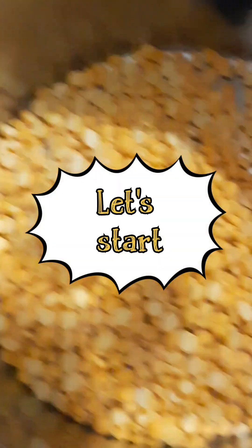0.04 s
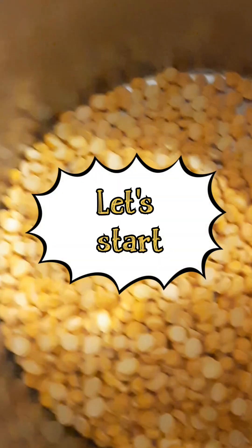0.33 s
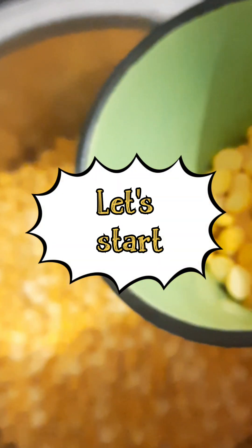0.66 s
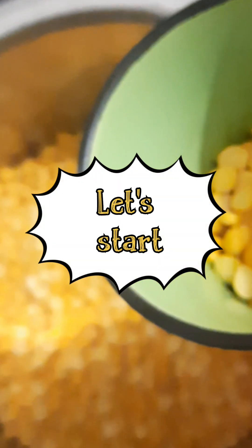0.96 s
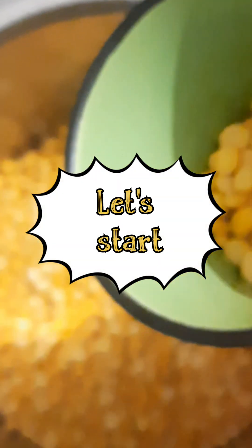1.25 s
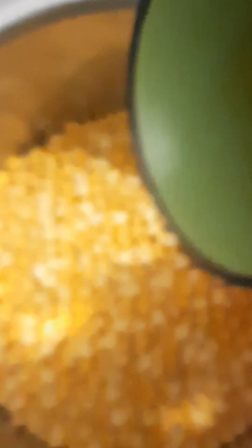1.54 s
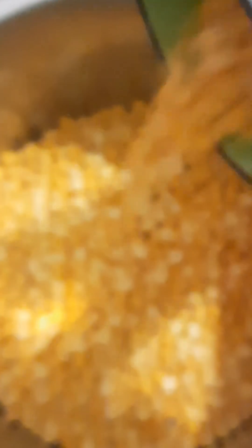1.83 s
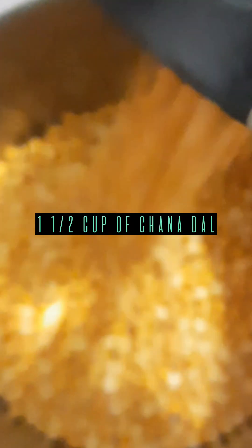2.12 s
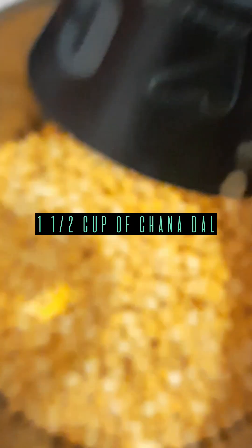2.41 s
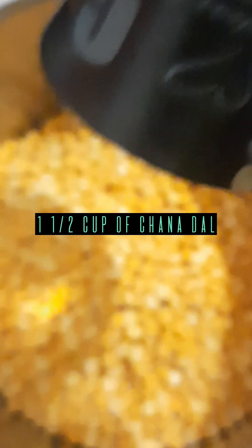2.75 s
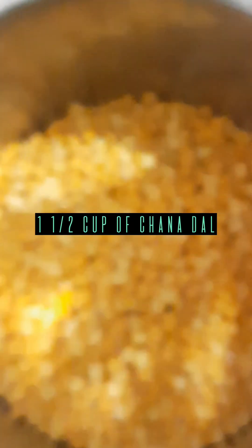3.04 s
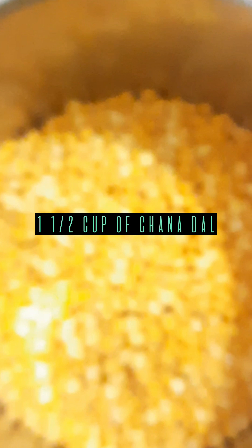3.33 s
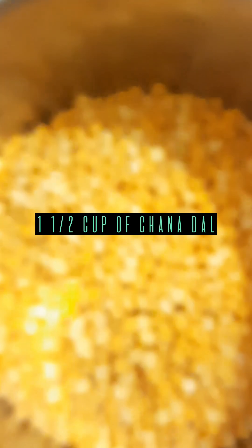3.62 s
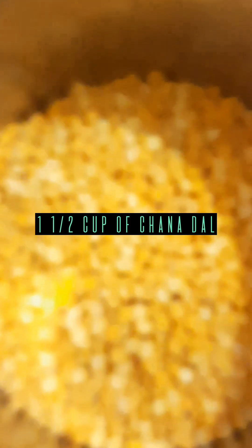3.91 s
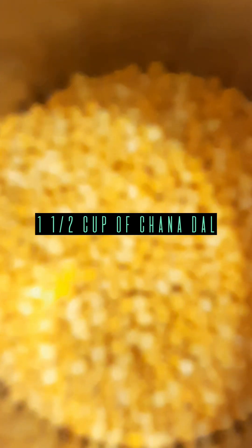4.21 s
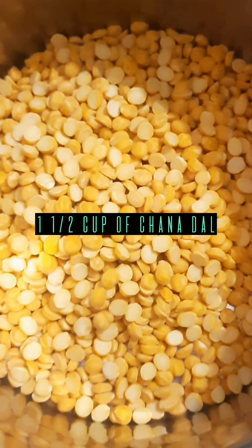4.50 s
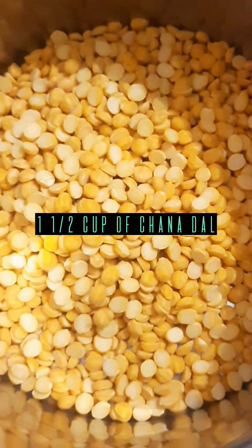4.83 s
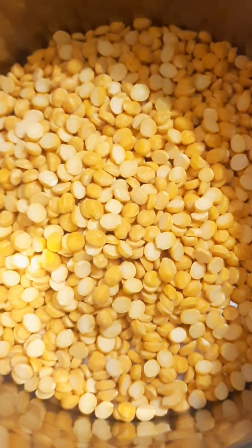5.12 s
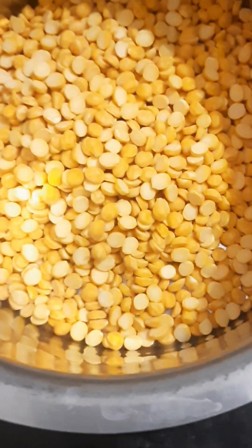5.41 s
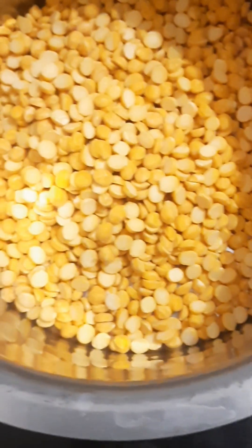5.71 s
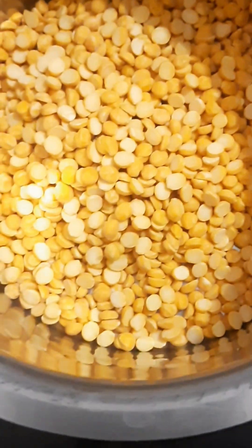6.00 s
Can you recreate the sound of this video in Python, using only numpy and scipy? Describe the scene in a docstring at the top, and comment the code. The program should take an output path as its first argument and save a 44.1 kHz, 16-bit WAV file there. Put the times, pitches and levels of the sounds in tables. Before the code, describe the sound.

A very faint, low kitchen rumble opens, with tiny handling clicks at about 0.2 and 0.4 seconds, and rises slightly around 1 second. From 1.6 seconds, dry lentils skitter softly down a tilted steel cup, close and on the left. Just before 2 seconds, a sharp tick starts the pour: countless small, bright collisions on a heap of lentils merge into a rattling hiss while the steel pot resounds. The stream is fullest near 2.2 seconds and dies away by 2.6. After a pause with only room tone, the empty cup knocks on the counter at 3.9 seconds with a dull thud, rocks in a quick clatter around 4.1 to 4.2, and rings briefly. The low rumble continues to the end at about 6 seconds, with faint blurred tones and a couple of light clicks. The sound is close, picked up by a hand-held phone, with little echo.

```python
"""First comes the low rumble of a kitchen, swelling and sinking, with faint tones and handling clicks.
Close to the hand-held phone's two microphones, dry lentils skitter down a tilted steel cup and pour
onto a heap of lentils in a steel pot: countless small collisions click, and the pot resounds.
The empty cup is then put down on the counter, where it knocks, rocks and rings briefly."""
import sys
import numpy as np
from scipy import signal
from scipy.fft import rfft, irfft
from scipy.io import wavfile
from scipy.ndimage import uniform_filter1d

SR = 44100
rng = np.random.default_rng(int(sys.argv[2]) if len(sys.argv) > 2 else 0)


def write(x):
    x = np.atleast_2d(x).T
    wavfile.write(sys.argv[1], SR, np.round(np.clip(x, -1, 1) * 32767).astype(np.int16))


N = 271458
T = np.arange(N) / SR


def undb(db):
    """Decibels to gain; the levels in the tables are relative, ahead of each layer's own gain."""
    return 10 ** (np.asarray(db) / 20)


def unit(x):
    """Scale to rms 1."""
    return x / np.sqrt(np.mean(x ** 2))


def pan(db):
    """Gains for a level difference, left microphone minus right."""
    return undb(np.array([[db], [-db]]) / 2)


def swell(peak_s, rise_s, fall_s):
    """Gain that grows exponentially to 1 and decays again."""
    return np.exp(-np.maximum((peak_s - T) / rise_s, (T - peak_s) / fall_s))


def wander(rate_hz):
    """Smooth random drift with a spread near 1."""
    hold = int(SR / rate_hz)
    steps = np.repeat(rng.standard_normal(N // hold + 1), hold)
    return unit(uniform_filter1d(uniform_filter1d(steps, hold), hold)[:N])


def through(x, response):
    """Pass a sound through an impulse response."""
    return signal.fftconvolve(np.atleast_2d(x), np.atleast_2d(response), axes=1)[:, :N]


def colour(x, spectrum, size=4096):
    """Causal filter of unit energy through (frequency [Hz], level [dB]) points."""
    hz, db = np.transpose(spectrum)
    octave = np.log2(np.maximum(np.arange(size // 2 + 1), .5) * SR / size)
    skirt_db = 12 * np.minimum(octave - np.log2(hz[0]), 0)
    gain = undb(np.interp(octave, np.log2(hz), db) + skirt_db)
    cepstrum = irfft(np.log(gain))
    cepstrum[1:size // 2] *= 2  # fold to minimum phase
    cepstrum[size // 2 + 1:] = 0
    response = irfft(np.exp(rfft(cepstrum)))
    return through(x, response / np.linalg.norm(response))


def ring(modes, damping=1):
    """Response of decaying modes; the higher ones reach the two microphones out of step."""
    t, out = T[:SR], 0
    for hz, db, t60, pan_db in modes:
        lead = np.array([[.5], [-.5]]) * min(hz / 700, 2)
        decay = np.exp(-np.log(1000) * t * damping / t60)
        out = out + undb(db) * pan(pan_db) * np.sin(2 * np.pi * hz * t + lead) * decay
    return out


def echoes(x, t60, wet_db, build_s):
    """Add dense reflections that build up and die away, unrelated left and right."""
    t = T[:SR]
    tail = rng.standard_normal((2, SR)) * np.exp(-np.log(1000) * t / t60) * (1 - np.exp(-t / build_s))
    return x + undb(wet_db) * through(x, tail / np.linalg.norm(tail[0]))


def near_reflection(x, lag_s, sway, echo_db):
    """An echo whose path changes as the phone sways in the hand; its comb of peaks drifts."""
    late = [np.interp(T - lag_s * np.exp(sway * wander(2.527)), T, channel) for channel in x]
    return x + undb(echo_db) * np.array(late)


def scatter(x, t60, wet_db):
    """Every click gets its own short noisy tail from the grains and walls around it."""
    fade = np.exp(-2 * np.log(1000) * T[:SR // 4] / t60)
    energy = np.maximum(through(x ** 2, fade / fade.sum()), 0)
    return x + undb(wet_db) * np.sqrt(energy) * rng.standard_normal((2, N))


def blows(times, db):
    """One impulse for each contact."""
    return np.bincount(np.round(np.asarray(times) * SR).astype(int), undb(db), N)[:N]


def chatter(times, db, length_s, count=6):
    """Each blow is followed by a few fading micro-contacts of the rim."""
    lateness = rng.random((len(times), count))
    late_s = np.asarray(times)[:, None] + length_s * lateness
    late_db = db[:, None] - 10 - 8 * lateness
    return blows(times, db) + blows(late_s.ravel(), late_db.ravel())


def collisions(per_s, spread_db):
    """Random hits, mostly small; each lands at its own place, with its own lag between microphones."""
    chance = np.minimum(per_s / SR, 1) * np.ones(N)
    at = np.flatnonzero(rng.random(N) < chance)
    size_db = spread_db * np.minimum(rng.exponential(size=len(at)), 4)
    size = unit(undb(size_db)) / np.sqrt(chance[at])  # same power at any rate
    size = size * rng.choice([-1, 1], len(at))
    lag = rng.integers(-9, 10, len(at))
    return np.array([np.bincount(at, size, N), np.bincount((at + lag) % N, size, N)])


# Spectra of the room tone's four layers (frequency [Hz], level [dB])
RUMBLE_SPECTRUM = [(30, -28.5), (45, 0), (70, -1), (113, 3), (151, -9.5), (181, -1), (240, -7.5),
                   (300, -0.5), (395, -10), (500, -15), (700, -20.5), (1000, -58)]
MIDDLE_SPECTRUM = [(250, -13), (450, 3), (620, -0.5), (860, 5), (1150, -2), (1400, -9), (2200, -13),
                   (3000, -28.5), (6000, -48.5)]
HISS_SPECTRUM = [(900, -24), (2200, 7), (3300, 6.5), (5200, 1), (7400, 1), (9800, -10.5), (12500, -9.5),
                 (16000, -9.5)]
RUSH_SPECTRUM = [(500, -13), (1200, 7.5), (2200, 6), (3400, 3.5), (5200, -6.5), (7400, -9.5), (9800, -23),
                 (15500, -23.5)]
# Rise and fall of the room tone (time [s], level [dB])
ROOM_LEVEL = [(0.0, -71.5), (0.234, -70), (0.95, -67.5), (1.04, -53.5), (1.19, -54), (2.49, -54.5),
              (2.77, -60.5), (3.59, -58), (4.13, -43), (4.52, -50.5), (5.44, -51), (5.57, -50.5),
              (5.64, -56), (6.156, -56.5)]
# Swells of soft rushing noise (peak time [s], rise [s], fall [s], middle [dB], rush [dB], hiss [dB])
ROOM_SWELLS = [(1.16, 0.045, 0.16, -48.5, -55.5, -88), (3.921, 0.21, 0.31, -72, -58, -58.5),
               (4.158, 0.14, 0.05, -37.5, -51.5, -59.5), (5.54, 0.068, 0.034, -60, -70, -78)]

def room_tone():
    """The kitchen all around: rumble alike at both microphones, a diffuse middle, hiss and swells."""
    level_db = np.interp(T, *np.transpose(ROOM_LEVEL))
    usual_db = -54.5
    middle_gain = undb(-62 + 1.41 * (level_db - usual_db))  # swings further than the rumble
    hiss_gain = undb(-75.5 - 15.5 * (T < 0.99))  # steady after a much quieter start
    middle_swell, rush_swell, hiss_swell = sum(
        undb(db)[:, None] * swell(s, rise_s, fall_s) for s, rise_s, fall_s, *db in ROOM_SWELLS)
    noise = rng.standard_normal((9, N))
    rumble = colour(noise[0] * pan(1.2) + undb(-13) * noise[1:3], RUMBLE_SPECTRUM)
    rumble *= undb(level_db + 2 + 0.7 * wander(10))
    middle = near_reflection(colour(noise[3:5], MIDDLE_SPECTRUM), lag_s=0.003705, sway=0.087, echo_db=-6)
    middle *= undb(wander(8.8)) * np.hypot(middle_gain, middle_swell)
    hiss = near_reflection(colour(noise[5:7], HISS_SPECTRUM), lag_s=0.000938, sway=.04, echo_db=-15.5)
    hiss *= undb(.4 * wander(13)) * np.hypot(hiss_gain, hiss_swell)
    rush = colour(noise[7:9], RUSH_SPECTRUM) * rush_swell
    return rumble + pan(-4) * middle + pan(4.8) * hiss + pan(3.2) * rush


# Faint, blurred narrow tones (start [s], length [s], pitch [Hz], width [Hz], level [dB])
FAINT_TONES = [(0, 0.14, 3490, 70, -89.5), (0.083, 0.27, 4530, 120, -88), (1.59, 0.21, 835, 30.14, -58),
               (4.67, 0.16, 840, 44.7, -55.5), (4.937, 0.45, 1190, 60.06, -59.5),
               (4.98, .2, 6500, 890, -80), (4.991, 0.45, 3166, 402, -77.5), (5.755, 0.091, 1065, 90, -57.5),
               (5.76, 0.24, 2130, 397, -71), (5.856, 0.53, 842, 45.18, -62)]

def faint_tones():
    """Faint, blurred narrow tones a little to the right, opening with a slight ring of steel."""
    out = 0
    for s, length, hz, width_hz, db in FAINT_TONES:
        arch = np.sin(np.pi * np.clip((T - s) / length, 0, 1))
        phase = 2 * np.pi * hz * T
        band = wander(width_hz) * np.sin(phase) + wander(width_hz) * np.cos(phase)
        out = out + undb(db) * arch * band
    return undb(-3) * pan(-4) * echoes(out, t60=.3, wet_db=-1.5, build_s=0.0086)


# Spectra of a bright tick and of the dull body, which the pour shares (frequency [Hz], level [dB])
TICK_SPECTRUM = [(300, -16), (700, 18.5), (1600, -10.5), (3500, -10.5), (7000, 15), (9500, -7.5),
                 (12000, 3.5), (16000, -3)]
BODY_SPECTRUM = [(150, -17.5), (300, -5.5), (480, -6.5), (850, 2), (1100, 0.5), (1700, 0), (2500, 1),
                 (4000, -6.5), (8000, -58.5)]
# Handling clicks and the first lentil (time [s], click [dB], body [dB], left minus right [dB])
LIGHT_TICKS = [(0.2011, -36.5, -38.5, -13), (0.4321, -40.5, -41, -16), (1.9531, -12.5, -14.5, 4.5),
               (4.653, -41, -35, -2), (5.603, -46, -45.5, -2.5)]

def ticks():
    """Light handling clicks and the tick of the first lentil landing, each bright with a duller body."""
    clicks = sum(pan(pan_db) * blows([s], [db]) for s, db, _, pan_db in LIGHT_TICKS)
    bodies = sum(pan(pan_db) * blows([s], [db]) for s, _, db, pan_db in LIGHT_TICKS)
    bright = colour(scatter(clicks, t60=0.02, wet_db=6), TICK_SPECTRUM)
    dull = colour(scatter(bodies, t60=0.036, wet_db=-1.5), BODY_SPECTRUM)
    return undb(-10.5) * echoes(bright + dull, t60=.14, wet_db=-10, build_s=.01)


# The cup meeting the counter (time [s], knock [dB], thud [dB])
CUP_KNOCKS = [(3.896, -1.5, -2), (3.9203, -12.5, -0.5), (3.9295, -14.5, -19), (4.075, -16, -36),
              (4.12, -12, -11.5), (4.1331, -4.5, -19), (4.147, -8.5, -21), (4.161, -6, -9.5),
              (4.17, -11, -0.5)]
# Spectrum of a knock (frequency [Hz], level [dB])
KNOCK_SPECTRUM = [(100, -17.5), (500, -3.5), (750, 0), (1050, 7), (1300, 5), (1700, 3), (2100, -4.5),
                  (3300, -13), (4300, -39), (8000, -53), (15000, -68)]
# Modes of cup wall, cup base and counter (frequency [Hz], level [dB], t60 [s], left minus right [dB])
WALL_MODES = [(3475, -4, 0.25, -9.5), (3650, 6, 0.21, 1), (3700, -5, .1, 1), (8800, -7, .08, -4),
              (9370, 2.5, .12, 5), (13800, -2.5, .09, 7), (15400, 1.5, .12, 5.5)]
BASE_MODES = [(896, -22.5, 0.2, 8), (1027, -17.5, 0.43, -5), (1104, -13, 0.065, -3),
              (1085, 0.5, 0.028, -20.5), (1376, -25.5, 0.2, 13), (1646, -4.5, 0.032, -1)]
COUNTER_MODES = [(124.8, 0, 0.91, 1.3), (214.2, -2, 0.43, 0), (316.3, 0.5, 0.25, -0.79),
                 (381, -4, 0.47, -1.2), (475, 1.5, 0.3, -2.2)]

def cup_down(let_go_s=4.14, grip_db=-18):
    """The cup lands on one edge, rocks and settles; the counter thuds and the freed steel rings."""
    times, knock_db, thud_db = np.transpose(CUP_KNOCKS)
    crack = undb(0.5) * pan(-1) * colour(chatter(times, knock_db, length_s=0.0076), KNOCK_SPECTRUM)
    crack = echoes(crack, t60=0.4, wet_db=-1, build_s=0.00057)
    base_ring = ring(BASE_MODES) * (1 - np.exp(-T[:SR] / 0.0035))  # takes a few cycles to get going
    base = undb(-12) * through(blows(times, knock_db), base_ring)
    base = echoes(base, t60=0.12, wet_db=-35, build_s=0.0062)
    wall_db = knock_db + grip_db * (times < let_go_s)  # the hand mutes the steel until it lets go
    wall = through(blows(times, wall_db), ring(WALL_MODES))
    blunt = signal.butter(3, 4200, fs=SR, output="sos")  # a blunt contact hardly reaches the top modes
    wall = undb(-31.5) * signal.sosfilt(blunt, wall)
    counter_ring = ring(COUNTER_MODES) * (1 - np.exp(-T[:SR] / 0.0014))
    thud = undb(-34) * through(blows(times, thud_db), counter_ring)
    return crack + base + wall + thud


POUR_START_S = 1.958  # the lentils leave the cup
# Spectrum of lentils skittering on steel (frequency [Hz], level [dB])
SKITTER_SPECTRUM = [(1500, -41.5), (2700, -24), (4400, -5.5), (5400, -12), (6700, -4.5), (8100, -14.5),
                    (9000, 2.5), (10300, -13), (11500, -7), (15800, 2)]
# Lentils breaking loose in the cup (time [s], skitter [dB], steel ring [dB])
SLIDE_SPURTS = [(1.623, -51, -64), (1.683, -46, -46.5), (1.704, -43.5, -40.5), (1.757, -51, -47),
                (1.809, -53, -47.5), (1.874, -46, -42)]

def slide(start_s=1.612, rise_s=0.025, fastest_s=1.81):
    """Close on the left, lentils skitter down the tilted cup; their weight damps its ring."""
    glide = np.clip((T - start_s) / rise_s, 0, 1) * (T < POUR_START_S)
    glide *= undb(-50.5 - 160 * (T - fastest_s) ** 2)
    spurt, spurt_ring = sum(
        undb(db)[:, None] * swell(s, rise_s=0.0045, fall_s=0.02215) for s, *db in SLIDE_SPURTS)
    hits = collisions(per_s=3300, spread_db=1.8) * undb(wander(110))
    skitter = colour(scatter(hits * np.hypot(glide, spurt), t60=.008, wet_db=3), SKITTER_SPECTRUM)
    wall = ring(WALL_MODES, damping=3.3)
    push = hits * np.hypot(undb(-2.5) * glide, spurt_ring)
    return pan(9.5) * (skitter + through(push, wall / np.linalg.norm(wall[0])))


# Spectrum of lentils clicking on the heap (frequency [Hz], level [dB])
CLICK_SPECTRUM = [(1500, -23), (2500, -24.5), (4300, -10.5), (5500, -8), (7300, -3), (8500, -8),
                  (10000, -6.5), (11200, 3), (13200, 2), (15800, 1)]
# Single lentils and clumps that stand out from the stream (time [s], level [dB])
LENTIL_CLUMPS = [(1.574, -53), (1.625, -28.5), (1.682, -25.5), (1.807, -21), (1.9606, -4.5), (1.964, -15),
                 (1.97, -12), (1.976, -15.5), (1.982, -13), (2.0126, -12.5), (2.589, -25.5)]
# Surges in the stream (time [s], gain in flow [dB])
FLOW_SURGES = [(2.089, 4), (2.195, 1.5), (2.272, 1.5)]
# Modes of the steel pot (frequency [Hz], level [dB], t60 before damping [s], left minus right [dB])
POT_MODES = [(127.3, -8.5, 0.74, -0.5), (492, -5, 0.2, 1), (712, 0.5, 0.36, -6), (723, 3.5, .11, -7),
             (1090, -7, .08, 1), (1460, 3, .08, 1.5), (1509, 6.5, 0.09, -1.5), (2877, 2.5, 0.15, 5),
             (11150, -0.5, .12, 1.5), (11360, 7, 0.12, 1), (12960, 9, 0.07, 0.5), (13340, 5.5, .08, 0.5),
             (14900, 16, 0.018, 14.5)]

def pour(fullest_s=2.2, empty_s=2.449):
    """Close up, lentils click on the heap; more flow gives more collisions, and the pot resounds."""
    from_fullest_s = np.clip(T, POUR_START_S, empty_s) - fullest_s
    after_empty_s = np.clip(T - empty_s, 0, 1)
    # the stream arches up to its fullest moment, then dies away once the cup is empty
    flow = (T > POUR_START_S) * undb(-85 * from_fullest_s ** 2 - 345 * after_empty_s)
    flow *= undb(sum(db * swell(s, rise_s=.01, fall_s=.06) for s, db in FLOW_SURGES))
    hits = collisions(per_s=1400 + 3800 * flow, spread_db=3.8) * flow * undb(-30)
    clumps = blows(*np.transpose(LENTIL_CLUMPS))
    left, right = colour(scatter(hits + clumps, t60=0.024, wet_db=1.5), CLICK_SPECTRUM)
    # the right microphone is shaded from the treble
    shaded = signal.sosfilt(signal.butter(2, 9500, fs=SR, output="sos"), right)
    clicks = np.array([undb(3.5) * left, undb(-3) * right + undb(-10) * shaded])
    spreading_db = 17.5 * from_fullest_s  # the pot answers more as the stream spreads to its wall
    settling_db = 153 * after_empty_s  # the heap settles against the pot, which outlasts the clicks
    push = hits * undb(-13 + spreading_db + settling_db + 1.3 * wander(60))
    pot = ring(POT_MODES, damping=1.5)
    pot_ring = undb(5.5) * through(push, pot / np.linalg.norm(pot[0]))
    body = undb(-2) * pan(0.67) * colour(scatter(push, t60=0.06, wet_db=-0.5), BODY_SPECTRUM)
    return clicks + body + pot_ring


def scene():
    """Lentils up close with a little kitchen echo, then the cup, with the room behind them."""
    lentils = echoes(slide() + pour(), t60=.25, wet_db=-10.5, build_s=0.015)
    return lentils + ticks() + cup_down() + room_tone() + faint_tones()


def record(dry):
    """The phone cuts the highest treble steeply."""
    top_hz = 15750
    return signal.sosfilt(signal.ellip(10, .2, 75, top_hz, fs=SR, output="sos"), dry)


dry = scene()
out = record(dry)
write(out)
```